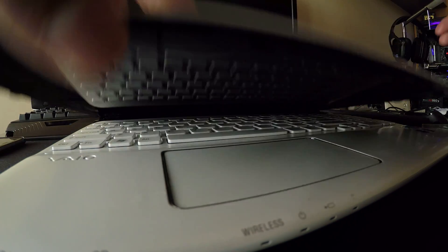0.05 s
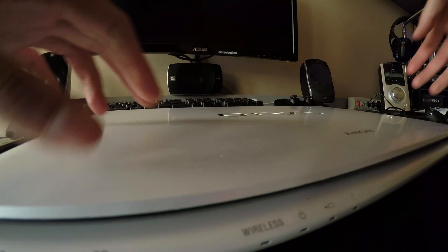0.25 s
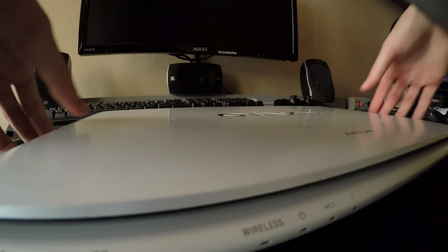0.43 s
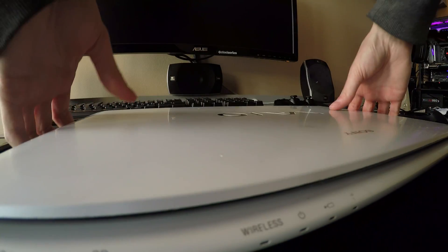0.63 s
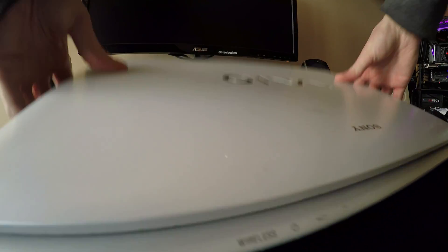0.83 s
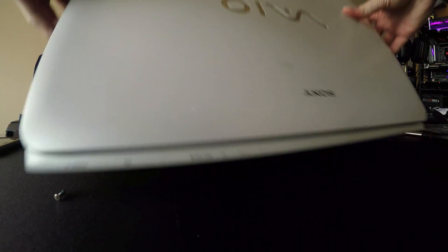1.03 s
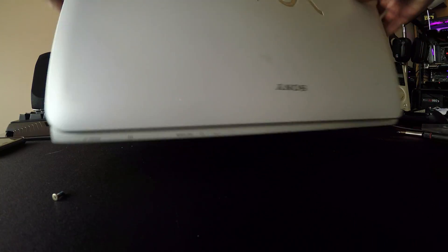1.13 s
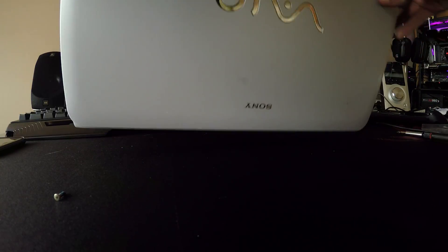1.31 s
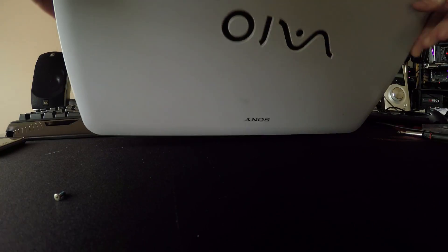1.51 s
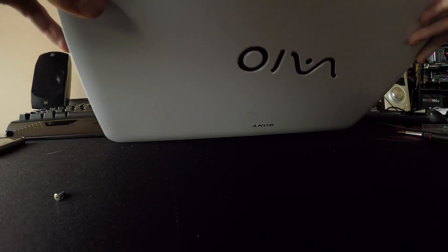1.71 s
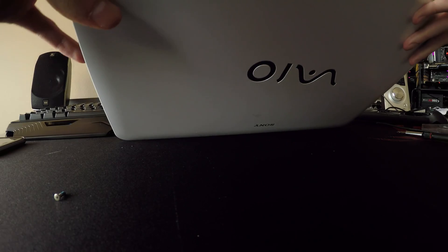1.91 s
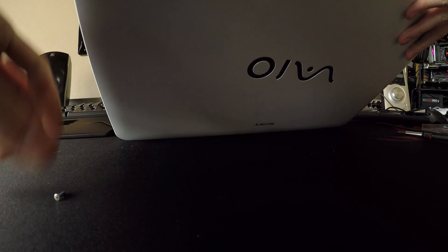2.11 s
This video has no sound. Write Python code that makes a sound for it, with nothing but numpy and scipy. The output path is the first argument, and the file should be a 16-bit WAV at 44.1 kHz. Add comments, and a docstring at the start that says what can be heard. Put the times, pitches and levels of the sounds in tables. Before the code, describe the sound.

In a small quiet room, a nearby laptop closes with a sharp clack and a plastic snap. Soft rubbing and clicks follow, then a dull bump, a firm knock on the desk and short plastic creaks.

```python
"""A desk in a small quiet room. Close by, a laptop lid clacks shut: its two corners land in turn
and ring the case, and its plastic edge snaps home. Hands rub and grip the case, lift it and stand it
on its back edge. It knocks twice and thuds, the desk sways, and the loaded plastic creaks as it sticks
and slips. Knocks, ticks and creaks cross the panels as bending waves, treble first."""
import sys
import numpy as np
from scipy import signal
from scipy.fft import rfft, irfft
from scipy.io import wavfile

SR = 44100
rng = np.random.default_rng(int(sys.argv[2]) if len(sys.argv) > 2 else 0)


def to_wav(s):
    """Save 16-bit WAV."""
    ch = np.atleast_2d(s).T  # columns
    pcm = np.round(np.clip(ch, -1, 1) * 32767)  # PCM
    wavfile.write(sys.argv[1], SR, pcm.astype(np.int16))


N = 94815
TOP_HZ = 15500


# Lid corners landing. Each row: start in seconds, level in dB, rattle t60 in seconds,
# tilt in dB per octave, case ring in dB.
CLACKS = [(.2452, -15, 0.022, 0, -32), (0.2504, -8, 0.015, -2, -20)]
# Rattle spectrum. Each row: frequency in Hz, relative level in dB.
CLACK_COLOUR = [(150, -9), (330, 6.5), (490, 7.5), (650, 0.5), (900, -1), (1200, 7), (1450, 3.5), (1750, 5),
                (1950, -6), (3000, -13), (4300, -8), (5600, -9.5), (7000, -18), (11000, -12), (15500, -19)]

def lid():
    """The two corners of the lid land in turn; each rattles and rings the case."""
    out, ring = np.zeros(N), case_ring()
    for start, db, t60, tilt_db, ring_db in CLACKS:
        rattle = burst(response(CLACK_COLOUR, tilt_db), t60)
        add(out, start, amp(db) * rattle + amp(ring_db) * ring)
    return out


# Modes of the closed case. Each row: frequency in Hz, relative level in dB, t60 in seconds.
CASE_MODES = [(217.5, -6.5, 0.074), (287, -8, 0.15), (374, -4.5, 0.1), (501, 1, 0.1), (610, -6, 0.04),
              (779, -11, 0.081), (1027, -13.5, 0.18), (1197, -3, 0.045), (1404, -2, 0.058),
              (1691, -3.5, 0.056), (2040, -13, 0.072)]

def case_ring():
    """After a blow the case rings in damped modes."""
    return sum(amp(db) * fade(t60) * np.sin(2 * np.pi * hz * seconds()) for hz, db, t60 in CASE_MODES)


# Plastic snaps and, at 1.1 s, a finger squeak. Each row: start in seconds, level in dB, centre in Hz,
# width in octaves, t60 in seconds.
SNAPS_AND_SQUEAK = [(0.1483, -46, 9400, 0.26, 0.015), (0.3174, -30, 1670, 0.36, 0.009),
                    (0.3247, -22, 5420, 0.45, 0.013), (0.4917, -43.5, 2080, 0.53, 0.016),
                    (0.586, -39, 5130, 1.2, .012), (0.813, -49, 5000, 1.3, 0.021),
                    (1.0515, -43, 6140, 1.8, 0.017), (1.1032, -44, 1860, 0.53, 0.019),
                    (1.1328, -48.5, 1670, 0.45, 0.011), (1.352, -46.5, 4400, 2.3, 0.017),
                    (1.726, -38.5, 3800, 0.92, 0.018)]

def snaps_and_squeak():
    """Small bright snaps of the plastic and a brief finger squeak."""
    out = np.zeros(N)
    for start, db, hz, octaves, t60 in SNAPS_AND_SQUEAK:
        add(out, start, amp(db) * burst(band(hz, octaves), t60))
    return out


# Back edge contacts. Each row: start in seconds, level in dB, tilt in dB per octave.
KNOCKS = [(1.6858, -16, -1.5), (1.6875, -7.5, 0), (1.7182, -19, -1)]
# Knock spectrum. Each row: frequency in Hz, relative level in dB.
KNOCK_COLOUR = [(100, -7.5), (370, 4.5), (600, 5), (900, -4), (1150, 0), (1550, -11), (1800, -11),
                (2300, -25), (3600, -19.5), (4700, -26), (6500, -35), (8300, -30.5), (15500, -53)]

def knocks():
    """The back edge lands on the desk; the first two contacts merge into one knock."""
    return contacts(KNOCKS, KNOCK_COLOUR, travel_s=0.000596, ring_db=-31.5,
                    scatter_db=-2, scatter_t60_s=0.018)


# Laptop thuds. Each row: start in seconds, level in dB, frequency in Hz, rise and t60 in seconds.
THUDS = [(.2513, -4, 115.8, 0.0035, 0.12), (.4895, -30.5, 182, .003, 0.075),
         (.4982, -15.5, 124, 0.0047, 0.098), (1.4185, -3.5, 84.6, 0.0041, 0.044),
         (1.690, -6, 59.7, 0.0022, 0.092), (1.6905, -17, 123, 0.0037, 0.16)]

def thuds():
    """The whole laptop thuds, low and slightly gritty."""
    return swings(THUDS, grit_db=-18.5)


# Desk motion. Each row: start in seconds, level in dB, frequency in Hz, rise and t60 in seconds.
SWAYS = [(.2745, -1.5, 30.6, 0.032, 0.15), (.4095, -30, 41.6, 0.0039, 0.2), (.9, -37, 31.7, 0.015, 0.32),
         (1.4395, -11, 34.14, 0.017, 0.37), (1.711, -11.5, 33.1, 0.01, 0.54), (2.08, -28, 37.8, .01, 0.13)]

def desk_sway():
    """The desk sways slowly after a blow or nudge."""
    return swings(SWAYS)


# Stick-slip runs. Each row: start, length and first gap in seconds, level in dB, slope in dB per second.
CREAKS = [(1.611, .021, 0.0075, -38.5, 300), (1.7539, .034, 0.0075, -23, 46),
          (1.8418, 0.057, .0105, -23.5, -25), (1.9424, .033, .0112, -31.5, -200)]
# Slip spectrum. Each row: frequency in Hz, relative level in dB.
CREAK_COLOUR = [(200, -16.5), (380, 3), (600, -9), (900, 6), (1150, 2), (1500, 10.5), (1900, -3),
                (2700, -4.5), (3900, -21.5), (4700, -16.5), (6000, -31), (15000, -41)]

def creaks(steady_gap_s=0.0068, gap_settle=0.62, echo_s=0.0035, echo_db=-8):
    """Slips quicken towards a steady gap; each sends a bending wave that the panel's edge echoes."""
    slips = np.zeros(N)
    for start, length, gap, db, db_per_s in CREAKS:
        elapsed = 0
        while elapsed < length:
            slips[int((start + elapsed) * SR)] += amp(db + db_per_s * elapsed)
            elapsed += gap
            gap = steady_gap_s + (gap - steady_gap_s) * gap_settle
    waves = convolve(slips, bending_wave(CREAK_COLOUR, tilt_db=0, travel_s=0.002086))
    add(waves, echo_s, amp(echo_db) * lowpass(waves, hz=2000, order=4))
    return waves


# Light contacts. Each row: start in seconds, level in dB, tilt in dB per octave.
TICKS = [(.2995, -25, 0), (.612, -39.5, 0), (.635, -41.5, 3.5), (.794, -40, -2.5), (.816, -40, -2),
         (.9475, -40, -0.5), (1.046, -33, -2), (1.111, -40, -3.5), (1.3722, -32, -2), (1.4022, -28.5, 0),
         (1.435, -36, 1), (1.4657, -30.5, -3.5), (1.474, -28, 1.5), (1.4822, -26.5, -0.5),
         (1.6345, -30, -1.5)]
# Tick spectrum. Each row: frequency in Hz, relative level in dB.
TICK_COLOUR = [(100, -11.5), (300, -0.5), (500, 2), (850, 7), (1300, -1), (1900, -7.5), (2900, -12),
               (3600, -14.5), (4700, -14), (6500, -24.5), (8300, -27), (15500, -41.5)]

def ticks():
    """The case ticks as it shifts against fingers and desk."""
    return contacts(TICKS, TICK_COLOUR, travel_s=0.0005, ring_db=-27.5,
                    scatter_db=1.5, scatter_t60_s=0.023)


# Rub and rumble envelopes. Each row: time in seconds, level in dB.
RUB_LEVELS = [(0, -68), (.18, -65.5), (.235, -44), (.27, -37.5), (.45, -57), (.54, -49.5), (.72, -51.5),
              (.86, -55.5), (1.0, -63), (1.25, -61.5), (1.38, -51), (1.5, -50), (1.56, -51.5), (1.63, -48),
              (1.67, -49.5), (1.92, -44.5), (2.03, -52.5), (2.15, -66)]
RUMBLE_LEVELS = [(0, -64.5), (.47, -66), (.495, -30.5), (.56, -34.5), (.63, -38), (.68, -46), (.76, -46),
                 (.87, -64.5), (1.3, -68), (1.42, -39.5), (1.66, -58), (1.75, -37.5), (1.92, -51.5),
                 (2.02, -53), (2.15, -63.5)]
# Rub and rumble spectra. Each row: frequency in Hz, relative level in dB.
RUB_COLOUR = [(100, -13.5), (400, 9), (800, 2), (1500, 1), (2500, -14.5), (4500, -11.5), (7000, -23),
              (15000, -23)]
RUMBLE_COLOUR = [(30, -5.5), (70, -6), (125, -0.5), (180, -5.5), (260, -31), (450, -28), (1000, -49),
                 (4000, -95)]

def hands(grains_per_s=900, spread_db=4):
    """Skin catches on the shell in tiny grains, and the hollow case rumbles."""
    catches = rng.random(N) < grains_per_s / SR
    grains = catches * noise() * amp(spread_db * noise())
    friction = 0.56 * grains / grains.std() + 0.53 * noise()
    rub = convolve(friction, response(RUB_COLOUR))
    rumble = convolve(noise(), response(RUMBLE_COLOUR))
    return rub * curve(RUB_LEVELS) + rumble * curve(RUMBLE_LEVELS)


# Fingertip slides. Each row: middle and half length in seconds, level in dB, centre in Hz,
# width in octaves.
SLIDES = [(0.441, 0.044, -63, 3630, 0.11), (0.448, 0.043, -66.5, 4700, .09),
          (0.862, 0.026, -54.5, 1660, 0.16), (0.96, 0.053, -67, 11100, .5)]

def slides():
    """A fingertip on the smooth lid gives a soft narrow hiss that swells and fades."""
    out = np.zeros(N)
    for middle, half_length, db, hz, octaves in SLIDES:
        swell = np.exp(-((seconds() - middle) / half_length) ** 2)
        out += amp(db) * swell * convolve(noise(), band(hz, octaves))
    return out


# Reflection spectrum. Each row: frequency in Hz, relative level in dB.
ROOM_COLOUR = [(100, 11.5), (500, 0), (1500, -3), (4500, 0.5), (8000, -1.5), (15000, 1)]

def room(x, level_db=-10, t60_s=0.22, onset_s=0.007):
    """Dense reflections of a small room build up and die quickly."""
    onset = 1 - np.exp(-(seconds() / onset_s) ** 2)
    tail = convolve(noise() * fade(t60_s) * onset, response(ROOM_COLOUR))
    return amp(level_db) * convolve(x, unit(tail))


# Room noise spectrum. Each row: frequency in Hz, relative level in dB.
AIR_COLOUR = [(20, 3.5), (35, 8.5), (60, 1), (120, -7.5), (200, -14.5), (500, -15.5), (900, -21.5),
              (1500, -21), (2300, -27.5), (5000, -31), (9000, -35), (15500, -40)]

def air(level_db=-50.5):
    """Steady rumble and hiss of the room."""
    colour = response(AIR_COLOUR)
    return amp(level_db) * signal.fftconvolve(noise(N + len(colour) - 1), colour, "valid")


def contacts(rows, colour, travel_s, ring_db, scatter_db, scatter_t60_s):
    """Each contact is a sharp push, a short scatter inside the case and a faint ring."""
    out, ring = np.zeros(N), case_ring()
    for start, db, tilt_db in rows:
        force = amp(scatter_db) * unit(noise() * fade(scatter_t60_s))
        force[0] = 1  # the push
        wave = convolve(force, bending_wave(colour, tilt_db, travel_s))
        add(out, start, amp(db) * (wave + amp(ring_db) * ring))
    return out


def bending_wave(colour, tilt_db, travel_s):
    """A push crosses a panel treble first; travel_s holds at 1 kHz. Unit peak."""
    spectrum = rfft(response(colour, tilt_db))
    hz = np.linspace(0, SR / 2, len(spectrum))
    dispersion = np.exp(-4j * np.pi * travel_s * np.sqrt(1000 * hz))
    first_arrival = int(travel_s * np.sqrt(1000 / TOP_HZ) * SR)
    wave = irfft(spectrum * dispersion)[first_arrival:]
    return wave / np.abs(wave).max()


def swings(rows, grit_db=None):
    """Low damped sines with optional dull grit."""
    out, t = np.zeros(N), seconds()
    for start, db, hz, rise, t60 in rows:
        wave = np.sin(2 * np.pi * hz * t)
        if grit_db is not None:
            grit = lowpass(noise(), hz=238, order=3)
            wave += amp(grit_db) * grit / grit.std()
        envelope = (1 - np.exp(-t / rise)) * fade(t60)
        add(out, start, amp(db) * wave * envelope)
    return out


# Base spectrum of snaps, squeak and slides. Each row: frequency in Hz, relative level in dB.
BAND_COLOUR = [(100, -4), (1000, 12.5), (15000, -9.5)]

def band(centre_hz, octaves):
    """Response of a steep-sided resonant band."""
    def skirts_db(hz):
        ratio = hz / centre_hz
        return -10 * np.log10(1 + (np.log2(ratio) / octaves) ** 4 * (1 + ratio ** 2) / 2)
    return response(BAND_COLOUR, extra_db=skirts_db)


def response(colour, tilt_db=0, extra_db=lambda hz: 0):
    """Minimum-phase response of unit energy from (Hz, dB) points, tilted per octave."""
    size = 8192
    hz = np.maximum(np.arange(size // 2 + 1) * SR / size, 1)
    point_hz, point_db = np.array(colour).T
    db = np.interp(np.log(hz), np.log(point_hz), point_db)
    db += tilt_db * np.log2(np.maximum(hz, point_hz[0])) + extra_db(hz)
    cepstrum = irfft(np.log(amp(db)))
    cepstrum[1:size // 2] *= 2
    cepstrum[size // 2 + 1:] = 0
    return unit(irfft(np.exp(rfft(cepstrum))))


def burst(colour, t60):
    """Coloured noise decaying from an rms of about one."""
    decay = fade(t60)
    return unit(convolve(noise() * decay, colour)) * np.linalg.norm(decay)


def amp(db):
    return 10 ** (np.asarray(db) / 20)


def seconds():
    return np.arange(N) / SR


def noise(samples=N):
    return rng.standard_normal(samples)


def fade(t60):
    return np.exp(-np.log(1000) * seconds() / t60)


def curve(points):
    """Gain over time from (s, dB) points."""
    return amp(np.interp(seconds(), *np.array(points).T))


def unit(x):
    """Scale to unit energy."""
    return x / np.linalg.norm(x)


def lowpass(x, hz, order):
    return signal.sosfilt(signal.butter(order, hz, fs=SR, output="sos"), x)


def convolve(x, impulse_response):
    return signal.fftconvolve(x, impulse_response)[:N]


def add(out, start_s, x):
    i = int(round(start_s * SR))
    out[i:] += x[:N - i]


def scene():
    """Laptop, desk and hands; only the sharp sounds feed the reflections."""
    clack, bright, knock, tick, creak = lid(), snaps_and_squeak(), knocks(), ticks(), creaks()
    sharp = clack + bright + knock + tick + creak
    room_send = clack + amp(-9) * bright + amp(4) * knock + amp(-1.5) * tick + amp(-8) * creak
    return (sharp + thuds() + desk_sway() + hands() + slides() + room(room_send) + air())[None]


# Microphone response. Each row: frequency in Hz, relative level in dB.
MIC_COLOUR = [(100, 0), (2500, 0), (3000, -3), (3550, 1.5), (4100, -1), (4700, -0.5), (5700, -0.5),
              (6800, -1), (8000, 0), (15000, 0.5)]

def record(dry):
    """The microphone colours the upper middle, and the top is cut."""
    coloured = convolve(dry[0], response(MIC_COLOUR))[None]
    return signal.sosfilt(signal.ellip(8, .2, 80, TOP_HZ, fs=SR, output="sos"), coloured)


dry = scene()
out = record(dry)
to_wav(out)
```